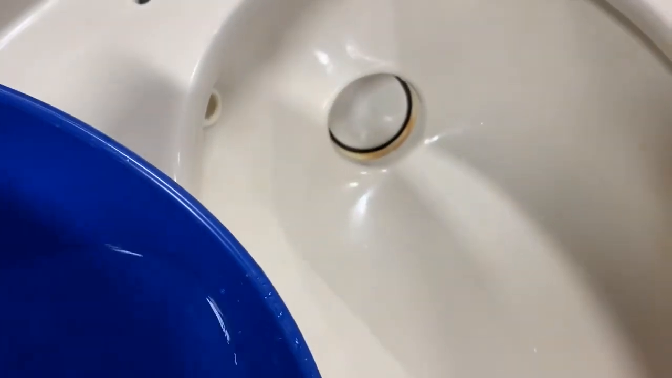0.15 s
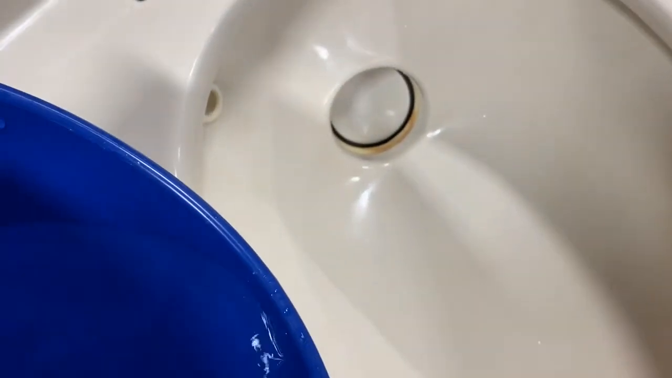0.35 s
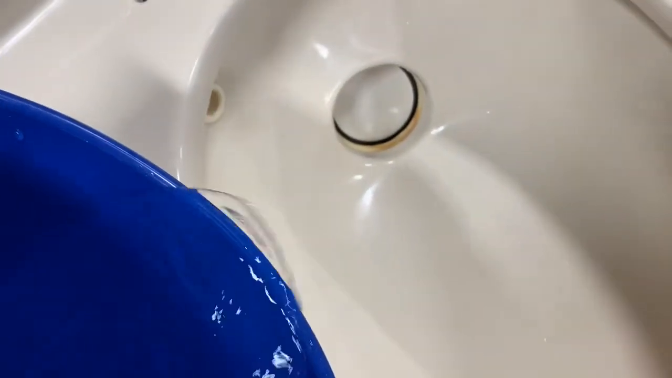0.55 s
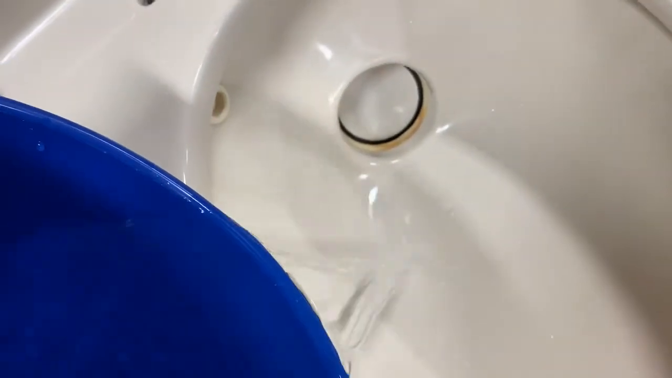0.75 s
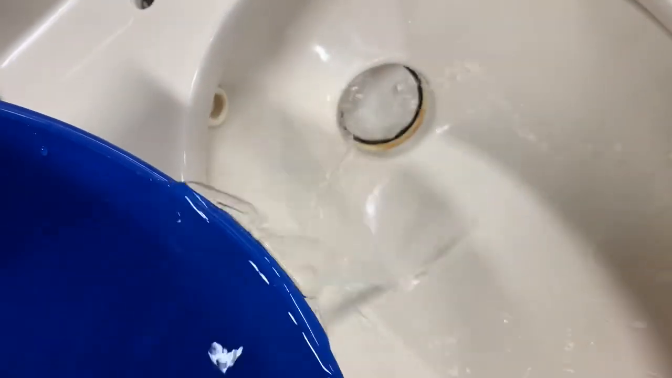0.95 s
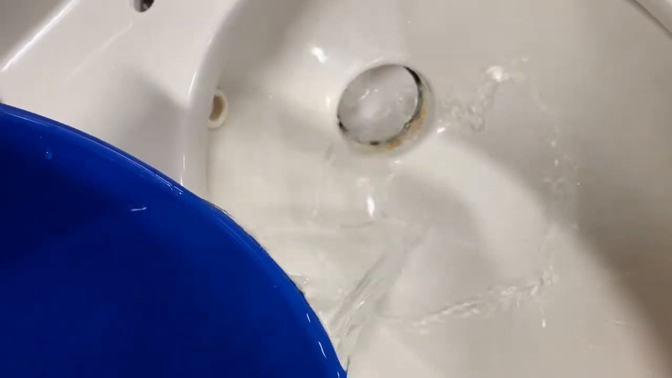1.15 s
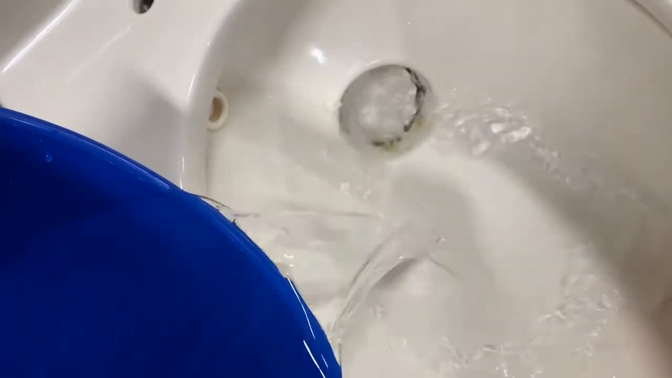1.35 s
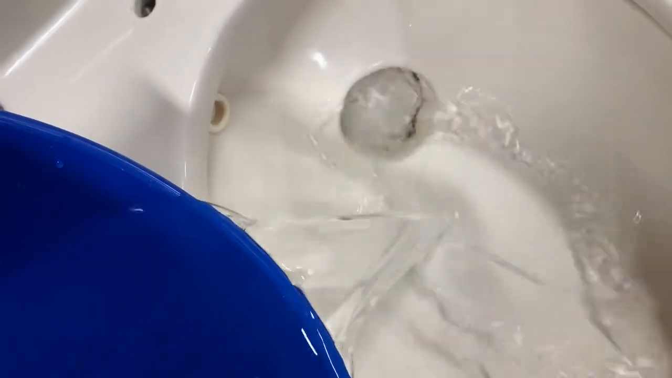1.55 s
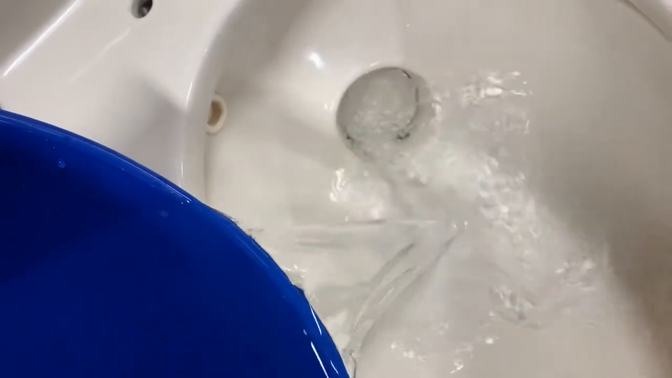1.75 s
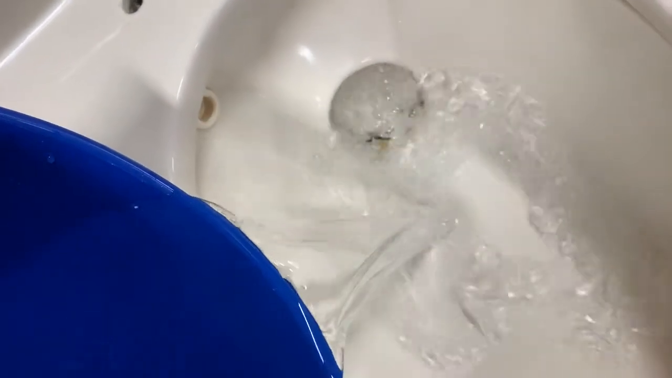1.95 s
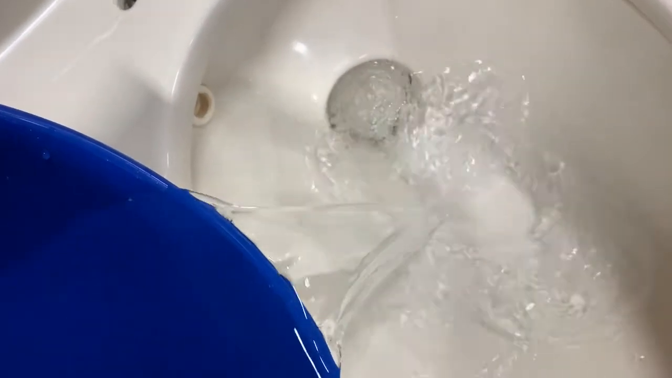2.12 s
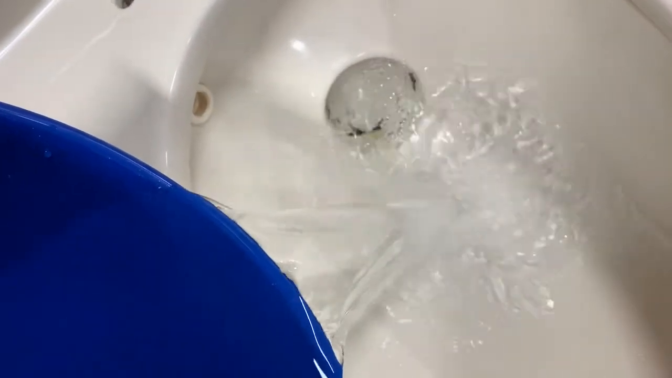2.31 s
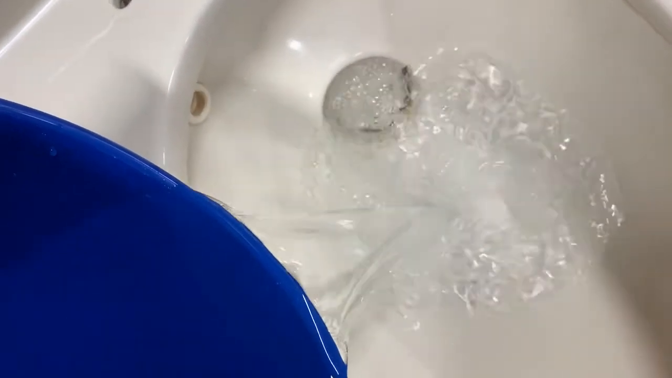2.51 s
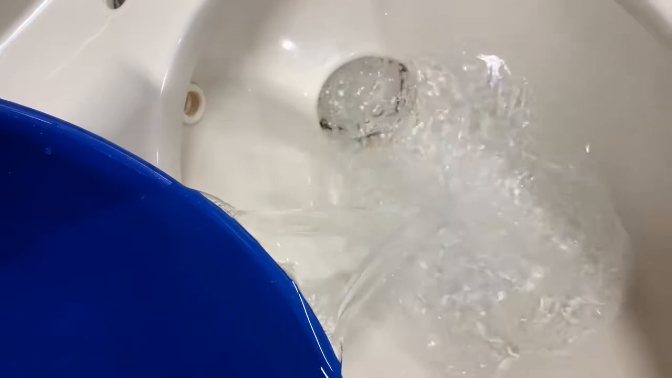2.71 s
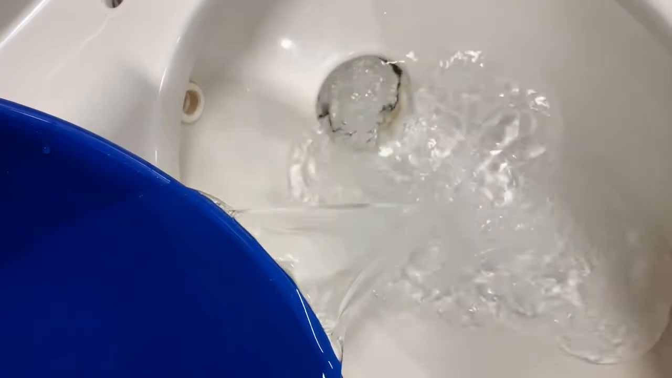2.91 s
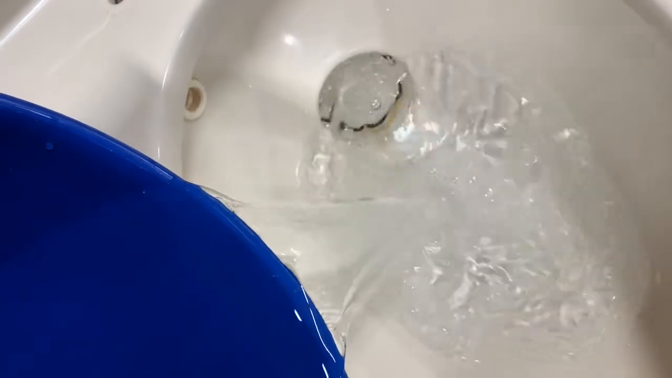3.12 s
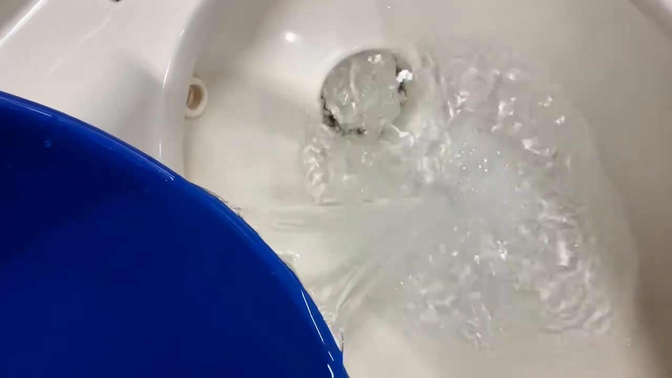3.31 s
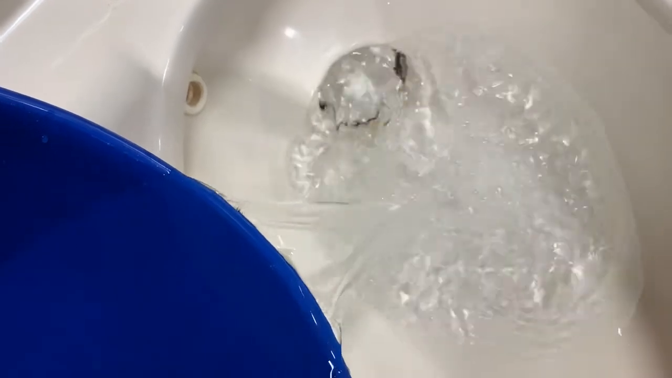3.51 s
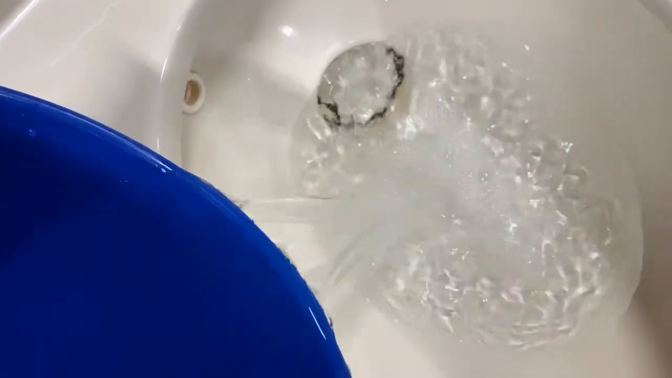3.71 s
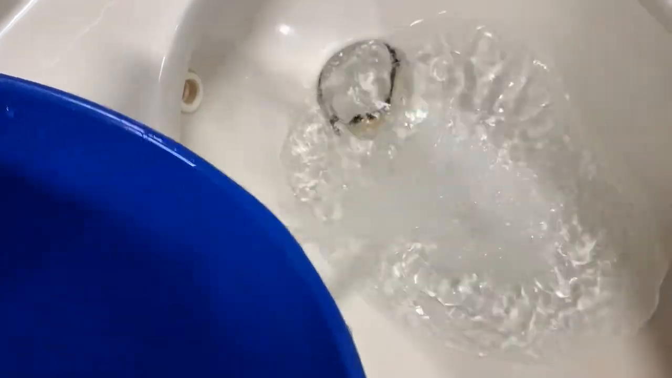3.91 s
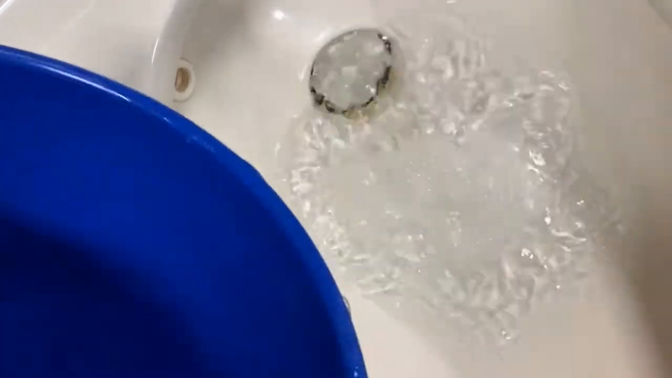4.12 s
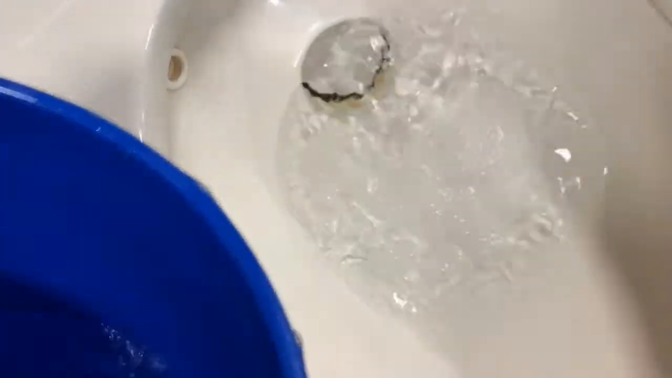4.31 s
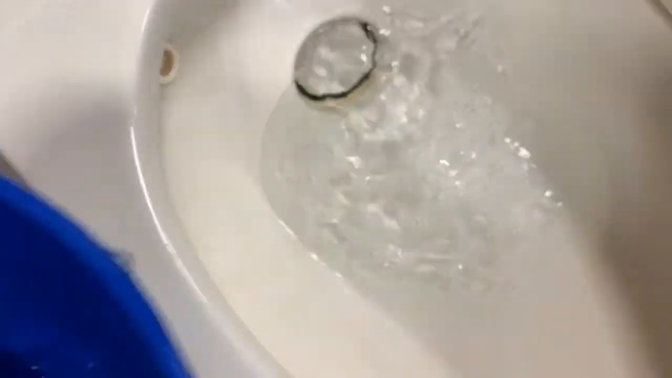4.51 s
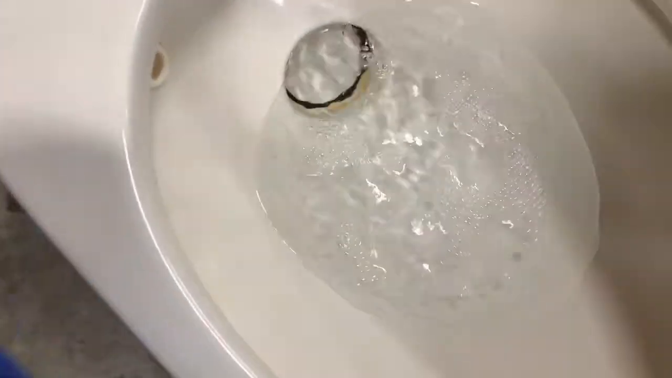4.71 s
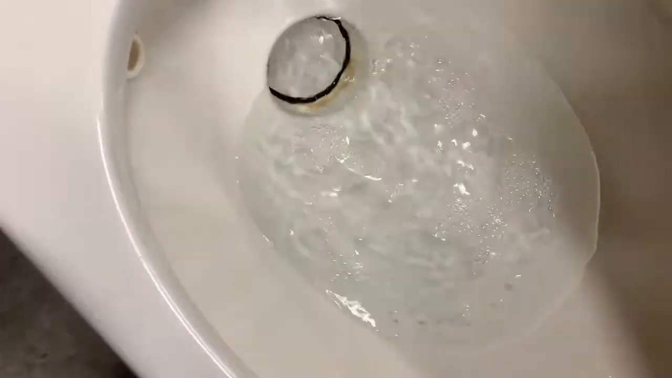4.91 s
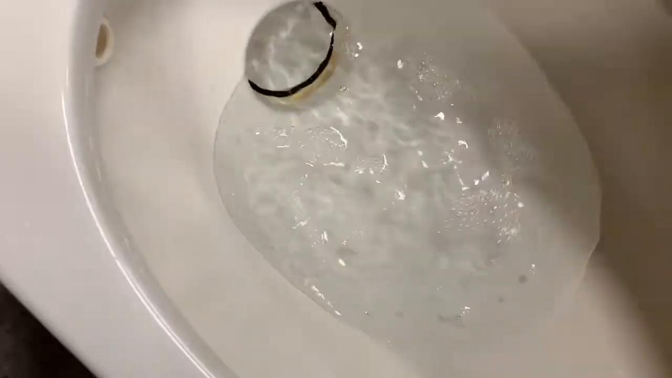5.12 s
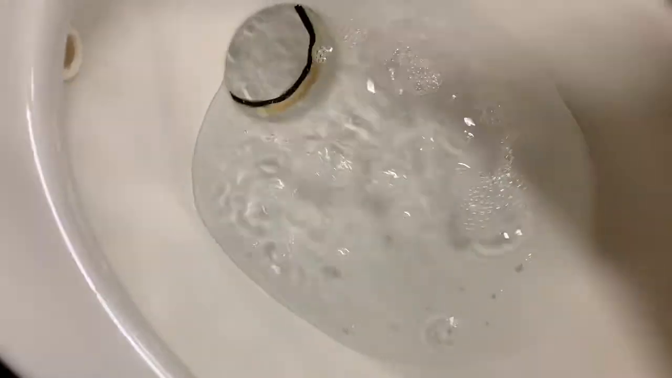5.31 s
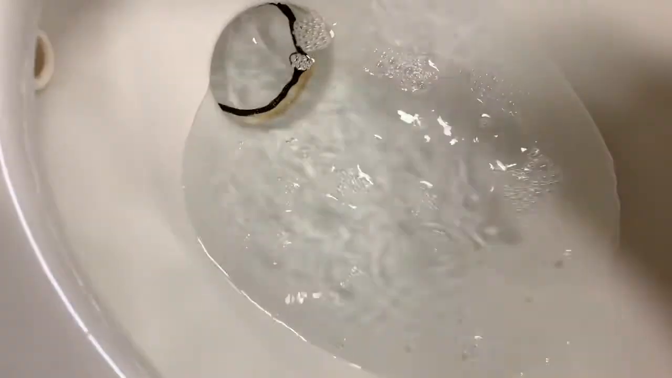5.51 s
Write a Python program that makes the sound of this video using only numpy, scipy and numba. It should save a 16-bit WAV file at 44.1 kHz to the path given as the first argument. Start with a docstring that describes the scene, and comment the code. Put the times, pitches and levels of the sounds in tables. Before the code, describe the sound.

A faint low room rumble and slight slopping come first. Then water tips from a plastic bucket into a porcelain bowl, slapping sharply on the glaze, with bubble plops and short drain glugs. It swells into a bright, churning rush with hollow ringing, steadies, breaks into last gulps and splashes, and leaves quiet fizzing foam. Close stereo pickup, short hard bowl echoes.

```python
"""Water poured into a bowl

Water is poured from a plastic bucket into a porcelain bowl in a workshop.
The stream slaps the glaze as decaying noise; trapped bubbles and gulps are damped sines of rising pitch.
Resonators ring the air of the bowl and of the drain, sparse taps echo, and foam leaves a fine fizz.
A low rumble of noise and a faint wavering hum fill the room; sides differ in arrival time and likeness."""
import sys
import numpy as np
from scipy import signal
from scipy.fft import rfft, irfft
from scipy.io import wavfile
from scipy.ndimage import uniform_filter1d
from numba import njit

SR = 44100
rng = np.random.default_rng(int(sys.argv[2]) if len(sys.argv) > 2 else 0)


def output_pcm(signal):
    """Save a mono or channel-first signal as 16-bit PCM at the path in sys.argv[1].

    Samples are clipped to [-1, 1] before scaling.
    """
    pcm = np.clip(np.atleast_2d(signal).T, -1, 1) * 32767
    wavfile.write(sys.argv[1], SR, np.round(pcm).astype(np.int16))


N = 249192

# Rumble of the room. Each row: time in seconds, level in dB.
RUMBLE_LEVEL = [(0.0, -59), (0.42, -63), (1.5, -66.5), (4.3, -65.5), (4.83, -58.5), (5.66, -62.5)]
# Its spectrum. Each row: frequency in Hz, density in dB per Hz.
ROOM_SPECTRUM = [(25, -35), (53, -2), (71, -2.5), (93, -3), (142, -6.5), (199, -8.5), (279, -29),
                 (3020, -44.5), (13300, -47), (16200, -67)]
# The hum. Each row: time in seconds, level of the sine in dB.
HUM_LEVEL = [(0.0, -61.5), (0.42, -75), (1.04, -55.5), (1.4, -63), (3.0, -70.5), (4.4, -72), (4.83, -58),
             (5.66, -71.5)]
# Low slops of water in bucket and bowl. Each row: time in seconds, level before filtering in dB.
LAPPING_LEVEL = [(0.0, -63), (0.17, -67), (0.3, -90), (0.75, -84), (1.0, -65), (3.05, -64.5), (4.1, -66.5),
                 (4.45, -65), (4.6, -71.5), (4.72, -61.5), (4.9, -63.5), (5.3, -65.5), (5.66, -84)]
# Their spectrum before filtering. Each row: frequency in Hz, density in dB per Hz.
SLOSH_SPECTRUM = [(200, -51), (270, -10), (400, 3.5), (550, -0.5), (800, -11.5), (1200, -20), (2200, -23.5),
                  (3000, -58.5)]
# Foam bursting on the pool. Each row: time in seconds, level in dB.
FIZZ_LEVEL = [(4.1, -57), (4.3, -79), (4.5, -54), (5.0, -55), (5.3, -54), (5.66, -56)]
# Its spectrum. Each row: frequency in Hz, density in dB per Hz.
FOAM_SPECTRUM = [(1300, -30), (1800, -20), (3000, -18), (4500, -10), (7000, -6.5), (8500, -0.5),
                 (10300, -1.5), (13000, -0.5), (14500, -8.5), (16200, -22)]
# Air in the drain mouth. Each row: peak time in seconds, peak level in dB.
DRAIN_GLUGS = [(1.15, -58.5), (1.31, -55), (1.46, -47.5), (1.55, -52), (1.77, -51)]
# Low notes of the bowl's air, rung by knocks.
# Each row: undisturbed pitch in Hz, width of the narrower resonance in Hz, relative level in dB.
BOWL_NOTES = [(777, 62, -5.5), (1245, 38, 5.5), (1622, 120, -9.5), (2232, 70, -7)]
# Resonances of the bowl's air. Each row: mean pitch in Hz, width in Hz, gain in dB.
BOWL_RESONANCES = [(1567, 32, -1.5), (2745, 100, 1)]
# Large air pockets gulping in the pool.
# Each row: start in seconds, strength in dB, starting pitch in Hz, t60 in seconds, share of pitch gained per t60.
GULP_EVENTS = [(0.794, -39.5, 506, 0.036, 0.58), (1.573, -37.5, 744, 0.11, 0.21),
               (1.749, -33.5, 593, 0.058, 0.16), (1.85, -30, 540, 0.14, 0.4),
               (1.933, -23.5, 765, 0.07, 0.8), (1.994, -29.5, 470, 0.09, 0.375),
               (2.076, -28.5, 558, 0.03, 0.22), (2.455, -41, 763, 0.05, .05),
               (2.528, -26, 650, 0.041, 0.25), (2.78, -44, 201, 0.092, 0.19),
               (3.012, -33.5, 200.4, 0.098, 0.34), (3.639, -45.5, 192, 0.09, 0.29),
               (3.719, -44, 207, 0.11, 0.15), (3.828, -33, 800, 0.077, 0.5), (3.86, -28, 733, 0.033, 0.32),
               (3.947, -22.5, 476.6, 0.067, 0.54), (3.99, -35, 491, 0.097, 0.32),
               (4.05, -30, 492, 0.043, 0.32), (4.088, -24.5, 495, 0.052, 0.22),
               (4.141, -21.5, 592, 0.02, 0.42), (4.245, -28.5, 613, 0.059, 0.074),
               (4.247, -32, 241, 0.14, 0.14), (4.298, -39, 644, 0.086, 0.046), (4.425, -54, 526, 0.033, .1),
               (4.738, -47.5, 630, 0.038, 0.22), (4.865, -53, 792, 0.13, 0.024),
               (4.908, -46.5, 970, 0.034, 0.046), (4.907, -49.5, 228, 0.14, 0.38),
               (5.005, -57, 650, 0.032, 0.11), (5.078, -58, 757, 0.034, .1)]
# Single bubbles that stand out. Each row: start in seconds, strength in dB, starting pitch in Hz, t60 in seconds.
BUBBLE_EVENTS = [(0.8118, -20.5, 1230, 0.013), (0.86, -26.5, 2440, 0.039), (1.039, -32.5, 1900, 0.027),
                 (1.149, -23.5, 4070, 0.038), (1.172, -26, 1167, 0.024), (1.2397, -24.5, 1143, 0.033),
                 (1.309, -19.5, 1445, 0.014), (1.402, -14.5, 1400, 0.015), (1.4432, -20, 1140, 0.034),
                 (1.446, -16, 3780, 0.022), (1.482, -24, 1224, 0.03), (1.5738, -23.5, 1350, 0.061),
                 (1.6824, -32, 1108, 0.089), (1.7742, -4, 1540, 0.0089), (1.809, -12, 1450, 0.0087),
                 (1.833, -16.5, 1460, 0.017), (1.87, -19.5, 1153, 0.04), (1.936, -20.5, 1390, .03),
                 (1.9656, -10.5, 2636, 0.028), (1.998, -26, 1396, 0.061), (2.1149, -16.5, 1170, 0.015),
                 (2.195, -27, 1300, 0.059), (2.224, -17.5, 1236, 0.02), (2.19, -27, 2160, 0.03),
                 (2.246, -21, 2180, 0.016), (2.284, -19, 1340, .02), (2.316, -19.5, 1240, 0.018),
                 (2.343, -16, 1490, 0.014), (2.4921, -21, 1250, 0.023), (2.633, -25.5, 1244, 0.035),
                 (2.7468, -10.5, 2040, 0.011), (3.838, -34, 1567, 0.038), (3.842, -40, 2200, .05),
                 (3.904, -26, 1278, 0.037), (3.931, -29.5, 1284, 0.044), (3.974, -28.5, 2870, 0.026),
                 (4.087, -20.5, 1190, 0.015), (4.103, -23, 2060, 0.014), (4.14, -34, 1307, 0.044),
                 (3.9926, -20.5, 2160, 0.033), (4.247, -27.5, 1270, 0.044), (4.2957, -22, 975, 0.016),
                 (5.317, -46.5, 2165, 0.071)]
# Slugs of water slapping down.
# Each row: start in seconds, nominal peak in dB, churn relative to that peak in dB, t60 in seconds.
SLAPS = [(0.788, -29, -27, 0.048), (0.847, -24.5, -5, 0.076), (0.881, -19, -3.5, 0.048),
         (0.963, -25, -20, 0.042), (1.042, -34, 7.5, 0.045), (1.1, -17, -33, 0.03),
         (1.133, -23.5, -8, 0.13), (1.208, -15.5, -33, 0.027), (1.24, -22.5, 1.5, 0.05),
         (1.401, -23.5, -8, 0.019), (1.447, -19, 5, 0.032), (1.562, -22, -29, 0.12),
         (1.6478, -14, -26, 0.02), (1.683, -23, 6.5, 0.048), (1.912, -24, -3, 0.12),
         (1.995, -21, -16, 0.026), (2.807, -26, 8, 0.062), (2.996, -23, 1, 0.03),
         (3.036, -26.5, -10, 0.025), (3.196, -29.5, -12, 0.16), (3.303, -29, 13, 0.052),
         (3.822, -24, -3, 0.045), (3.881, -29.5, -4, 0.088), (3.943, -24, 11, 0.028),
         (3.984, -26, 4.5, 0.061), (4.0874, -16, -21, 0.017), (4.237, -26.5, 5, 0.042),
         (4.246, -18, 6, 0.029), (4.2932, -29, 2, 0.044), (4.328, -46, 11, 0.044)]
# Bright opening of a slap. Each row: frequency in Hz, density in dB per Hz.
CRACK_SPECTRUM = [(4000, -22.5), (7200, -8), (8000, 0), (14000, -6), (16200, -18.5)]
# The steady stream before the final mix.
# Each row: time in seconds, churn of the pool in dB, spray on the glaze in dB, ringing of the bowl in dB.
POUR_LEVELS = [(0.738, -92, -63, -99), (0.8, -86, -72, -91), (1.0, -56.5, -72, -92),
               (1.11, -50.5, -50.5, -87), (1.22, -41, -43, -64), (1.42, -50, -35, -44),
               (1.7, -48.5, -42.5, -62), (2.02, -36.5, -41.5, -55.5), (2.32, -32, -38, -38),
               (2.55, -38, -41, -44), (3.1, -43.5, -47.5, -52), (3.78, -47, -50.5, -56.5),
               (4.12, -60, -48, -47.5), (4.22, -75, -63, -100), (4.38, -62, -57, -65),
               (4.5, -91, -64, -103)]
# Gushes over the rim of the bucket, before the final mix.
# Each row: peak time in seconds, length in seconds, then churn, spray, bowl and slop levels, all in dB.
GUSH_EVENTS = [(0.82, 0.044, -41, -44, -78, -56), (0.88, 0.1, -47, -35, -85, -78),
               (1.17, 0.024, -27.5, -26.5, -71, -60), (1.3, 0.11, -34.5, -34.5, -55, -53),
               (1.54, 0.3, -32, -36, -63, -69), (1.78, 0.56, -30, -34, -41, -75),
               (2.14, 0.28, -50, -35, -65, -78), (3.22, 0.42, -37.5, -44, -46.5, -61),
               (3.46, 0.36, -42.5, -44, -67, -85), (3.7, 0.2, -41.5, -41.5, -52.5, -72),
               (3.85, 0.089, -64, -64, -40, -60), (3.98, 0.23, -46, -66, -46, -50.5),
               (4.09, 0.055, -48, -59, -57, -46.5), (4.27, 0.081, -47, -61, -68, -53)]
# Bubbling of the pool. Each row: frequency in Hz, density in dB per Hz.
CHURN_SPECTRUM = [(600, -43), (800, -10.5), (1100, -3.5), (1500, -9), (1800, -2), (2600, -1), (3500, 2),
                  (5000, -7), (6000, -33.5)]
# Short plops in the froth. Each row: frequency in Hz, density in dB per Hz.
FROTH_SPECTRUM = [(750, -23), (1150, -1), (1600, -2), (2400, -5.5), (3300, -25)]
# Spray on the glaze. Each row: frequency in Hz, density in dB per Hz.
SPRAY_SPECTRUM = [(3500, -18.5), (4300, -7.5), (5500, -7), (7200, -9.5), (8000, -6.5), (10300, -7.5),
                  (13000, -7.5), (14500, -14), (16200, -45)]
# Likeness of water at the two microphones. Each row: frequency in Hz, likeness from 0 to 1.
WATER_LIKENESS = [(300, .88), (1400, .85), (3000, .55), (6000, .45), (7600, .3), (8600, .8), (13000, .88)]
# Delay of the right microphone. Each row: frequency in Hz, lag in samples.
WATER_LAG = [(300, 2), (600, -5), (1200, -.5), (3000, 2), (4400, 2), (4800, 21.5), (7400, 21.5),
             (7700, -13.3)]

HUM_HZ, HUM_CLIMB_HZ_PER_S = 189, 10
HUM_WIDTH_HZ = 18.7  # twice the rms wander of pitch
GLUG_S, OPEN_HZ, FLOODED_HZ = 0.091, 489, 292  # fading length; drain pitch when open and when flooded
FLOOD_S, SINK_S = 1.1, 0.23  # the moment the pitch starts to sink, and its time constant
CALM_FROM_S, CALM_BY_S = 2.11, 2.56  # the pool grows deep and steady
STIRRED, CALM = 0.085, 0.0096  # rms waver of the bowl's notes before and after, as a share of pitch
DRAINING_FROM_S, DRAINING_BY_S = 3.79, 4.01  # the stream breaks up
DRAINING_CLIMB = 0.036  # climb of the notes over that time, as a share of pitch
POOL_PAN_DB, DREGS_PAN_DB = -6, 4  # left over right: early gulps lie right, the dregs lie left
DREGS_S, DEEP_HZ = 4.2, 300  # start of the dregs; main gulps up to this pitch stay central
SLAP_CREST_DB = 2  # lowers each slap below its nominal peak
CRACK_DB, CRACK_S = -9, 0.002  # level against the nominal peak; delay and half width of the burst
SPITS_PER_S, SPIT_SPREAD_DB = 75, 3.5
GUSH_RISE, GUSH_FADE_DB = 0.84, 25.5  # rise time as a share of the length; fall over one length
EDGE_HZ = 16100


def amp(db):
    """Logarithmic law of level: decibels become an amplitude ratio."""
    return 10 ** (np.asarray(db) / 20)


def evened(x):
    """Normalisation of power: scales to rms 1."""
    return x / np.sqrt(np.mean(x ** 2) + 1e-20)


def read(points, hz):
    """Interpolation of a curve on a logarithmic frequency axis."""
    f, value = np.transpose(points)
    return np.interp(np.log(hz + 1), np.log(f + 1), value)


def level(rows, axis=1):
    """Amplitude envelope: dB joined by straight lines, -120 dB outside the rows."""
    rows = np.asarray(rows)
    return amp(np.interp(np.arange(N) / SR, rows[:, 0], rows[:, axis], -120, -120))


def drift(width_s):
    """Slow random wander of a parameter: twice-smoothed noise of rms 1."""
    size = int(width_s * SR)
    smooth = uniform_filter1d(rng.standard_normal(N), size)
    return evened(uniform_filter1d(smooth, size))


def clumps(width_s, depth_db):
    """Random amplitude modulation: surges as a gain of rms 1."""
    return evened(amp(depth_db * drift(width_s)))


def swells(rows, axis, rise=1., fade_db=14.):
    """Exponential growth and decay: summed power of rows of peak s, length s, dB.."""
    t, power = np.arange(N) / SR, np.zeros(N)
    for row in rows:
        u = (t - row[0]) / row[1]
        power += amp(row[axis] - fade_db * np.maximum(u, -u / rise)) ** 2
    return power


def gushes(axis):
    """Addition of powers: what the gushes add to one layer."""
    return swells(GUSH_EVENTS, axis, GUSH_RISE, GUSH_FADE_DB)


def hiss(spectrum, like=WATER_LIKENESS, lag=WATER_LAG):
    """Spatial coherence: steady coloured noise, partly alike at the two microphones."""
    hz = np.fft.rfftfreq(N, 1 / SR)
    left, other = rfft(rng.standard_normal((2, N)))
    same = np.clip(read(like, hz), 0, 1)
    delayed = left * np.exp(-2j * np.pi * hz * read(lag, hz) / SR)
    right = same * delayed + np.sqrt(1 - same ** 2) * other
    return evened(irfft(np.array([left, right]) * amp(read(spectrum, hz)), N))


def resonate(x, hz, width):
    """Resonance by heterodyning: shifts the curve hz to zero, smooths, and shifts back at gain 1."""
    turn = np.exp(2j * np.pi * np.cumsum(hz * np.ones(N)) / SR)
    r = np.exp(-np.pi * width / SR)
    return 2 * (turn * signal.lfilter([1 - r], [1, -r], x / turn)).real


@njit
def ring(rows, n, sr):
    """Damped oscillation of rising pitch; rows: s, gain, Hz, t60, rise, left-right gain, lag samples, attack s."""
    out = np.zeros((2, n))
    for s, gain, hz, t60, rise, side, lag, attack in rows:
        for c in range(2):
            start = s * sr + c * lag
            for i in range(max(int(start) + 1, 0), min(int(start + t60 * sr), n)):
                t = (i - start) / sr
                shape = (1 - np.exp(-t / attack)) * 10 ** (-3 * t / t60)
                phase = 2 * np.pi * hz * t * (1 + rise * t / t60 / 2)
                out[c, i] += gain * side ** (.5 - c) * shape * np.sin(phase)
    return out


def swarm(spectrum, per_s, cycles, spread_db, rise, pan_db):
    """Superposition of many bubbles at random moments, pitches and places; a few are loud."""
    count = int(per_s * N / SR)
    u, g = rng.random((count, 3)), rng.standard_normal((count, 3))
    lo, hi = spectrum[0][0], spectrum[-1][0]
    hz = lo * (hi / lo) ** u[:, 1]
    size_db = -spread_db * np.log(np.maximum(u[:, 2], .004))
    t60 = cycles / hz * np.exp(0.62 * g[:, 2])
    gain = amp(read(spectrum, hz) + size_db) * hz  # high bubbles are short and thinly spread
    # scattered places spread the arrival times, which blurs the likeness
    likeness = np.clip(read(WATER_LIKENESS, hz), .05, .99)
    scatter = np.sqrt(-2 * np.log(likeness)) * SR / (2 * np.pi * hz)
    lag = read(WATER_LAG, hz) + scatter * g[:, 1]
    rows = [u[:, 0] * N / SR, gain, hz, t60, rise + 0 * hz, amp(pan_db * g[:, 0]), lag, t60 / 8]
    return evened(ring(np.transpose(rows), N, SR))


def room():
    """Broadband rumble, nearly coherent in the bass, and a frequency-modulated hum that creeps upward."""
    rumble = hiss(ROOM_SPECTRUM, [(100, 0.91), (1000, 0.14)], [(0, 0), (1, 0.025)]) * clumps(0.044, 0.61)
    wander = evened(signal.lfilter([1], [1, -np.exp(-80 / SR)], rng.standard_normal(N)))
    hz = HUM_HZ + HUM_CLIMB_HZ_PER_S * np.arange(N) / SR + HUM_WIDTH_HZ * wander / 2
    hum = level(HUM_LEVEL) * np.sin(2 * np.pi * np.cumsum(hz) / SR) * clumps(0.01, 3.1)
    return level(RUMBLE_LEVEL) * rumble + np.array([hum, np.roll(hum, 6)])  # right is 6 samples late


def lapping():
    """Level-dependent spectrum: low slops of moving water; the livelier, the brighter."""
    slops = swarm(SLOSH_SPECTRUM, 1100, 14, 1.8, rise=.2, pan_db=3)
    slops = evened(slops + 0.59 * hiss(SLOSH_SPECTRUM)) * clumps(0.022, 3.2)
    dull = signal.sosfilt(signal.butter(4, 430, fs=SR, output="sos"), slops)
    gain = np.sqrt(level(LAPPING_LEVEL) ** 2 + gushes(axis=5))
    lively = (gain / amp(-56)) ** .45
    return gain * (dull + lively * (slops - dull))


def fizz():
    """Dense random superposition: tiny foam bubbles burst all over the pool."""
    pops = swarm(FOAM_SPECTRUM, 6500, 30, 3.0, rise=.05, pan_db=3)
    foam = evened(pops + 0.66 * hiss(FOAM_SPECTRUM))
    return level(FIZZ_LEVEL) * foam * clumps(0.0055, 1.3) * clumps(0.045, 1.3)


def drain():
    """Resonance driven by turbulence: the drain mouth rings, and its pitch sinks as it floods."""
    flooding = np.maximum(np.arange(N) / SR - FLOOD_S, 0)
    pitch = FLOODED_HZ + (OPEN_HZ - FLOODED_HZ) * np.exp(-flooding / SINK_S)
    turbulence = rng.standard_normal(N)
    tone = evened(resonate(resonate(turbulence, pitch, 45), pitch, 70))
    glugs = [(s, GLUG_S, db) for s, db in DRAIN_GLUGS]
    gain = np.sqrt(swells(glugs, axis=2, rise=0.85, fade_db=17.5))
    return gain * tone * clumps(0.023, 1.8)


def bowl_notes():
    """Impulsive excitation of resonances: irregular knocks of falling water ring the air in the bowl."""
    t = np.arange(N) / SR
    knocks = (rng.random(N) < 600 / SR) * rng.standard_normal(N) * clumps(0.01, 3)
    push = knocks + 0.4 * np.roll(knocks, 300) * [[1], [-1]]  # a later copy, opposed at the two sides
    push = push + 0.035 * rng.standard_normal((2, N))
    bend = 1 + np.interp(t, (CALM_FROM_S, CALM_BY_S), (STIRRED, CALM)) * drift(.03)
    bend += np.interp(t, (DRAINING_FROM_S, DRAINING_BY_S), (0, DRAINING_CLIMB))
    notes = 0
    for hz, width, db in BOWL_NOTES:
        narrow = resonate(push, hz * bend, width)
        notes = notes + amp(db) * resonate(narrow, hz * bend, 2.8 * width)
    return np.sqrt(level(POUR_LEVELS, axis=3) ** 2 + gushes(axis=4)) * evened(notes)


def with_company(rows, count, spread_hz, late_s, under_db):
    """Fragmentation: each pocket breaks off smaller neighbours of nearby pitch, a moment later."""
    rows = np.array(rows)
    chance = rng.random((len(rows), count, 4))
    extra = np.repeat(rows[:, None], count, axis=1)
    extra[..., 0] += late_s * chance[..., 0]
    extra[..., 1] *= amp(-under_db * (1.0 + chance[..., 1]))
    reach_hz = spread_hz * np.clip(extra[..., 2] / 500, 0, 1) ** 3  # the deepest stay near their pitch
    extra[..., 2] += np.maximum(reach_hz * (chance[..., 2] - .38), -extra[..., 2] / 5)
    extra[..., 3] *= 0.4 + 0.6 * chance[..., 3]
    return np.vstack([rows, extra.reshape(-1, rows.shape[1])])


def voices_of_air():
    """Pulsation of trapped air: single bubbles and gulps ring in small clusters."""
    small = [(s, amp(db), hz, t60, .04, 1, read(WATER_LAG, hz), .003) for s, db, hz, t60 in BUBBLE_EVENTS]
    large = []
    for s, db, hz, t60, rise in GULP_EVENTS:
        pan_db = POOL_PAN_DB if s < DREGS_S else DREGS_PAN_DB
        side = amp((hz > DEEP_HZ) * pan_db)
        large.append((s, amp(db), hz, t60, rise, side, read(WATER_LAG, hz), .005))
    small = with_company(small, count=7, spread_hz=800, late_s=.011, under_db=10)
    large = with_company(large, count=10, spread_hz=1100, late_s=.035, under_db=8)
    return ring(np.vstack([small, large]), N, SR)


def cracks():
    """Broadband transient: each slap opens with a brief bright spit."""
    t = np.arange(N) / SR
    gain = sum(amp(db + CRACK_DB) * np.exp(-((t - s) / CRACK_S - 1) ** 2) for s, db, _, _ in SLAPS)
    return gain * hiss(CRACK_SPECTRUM)


def spits():
    """Random impulses spread by a window: brief bright puffs of hiss within the spray."""
    size_db = SPIT_SPREAD_DB * np.minimum(rng.exponential(1, N), 3)
    size = (rng.random(N) < SPITS_PER_S / SR) * amp(size_db)
    puffs = signal.oaconvolve(size, np.hanning(round(2 * CRACK_S * SR)), "same")
    return evened(puffs * hiss(CRACK_SPECTRUM))


def slap_powers():
    """Exponential decay: each slap swells within milliseconds and dies fast; powers for churn and spray."""
    out, t = np.zeros((2, N)), np.arange(6000) / SR
    for s, db, mid_db, t60 in SLAPS:
        shape = (1 - np.exp(-t / 0.0042)) ** 2 * amp(db - SLAP_CREST_DB - 60 * t / t60)
        part = out[:, round(s * SR):round(s * SR) + len(t)]
        part += np.array([amp(mid_db) * shape, shape]) ** 2
    return out


def bowl(x):
    """Cavity resonance: the bowl's air reinforces pitches that shift with the heaving surface."""
    out = x
    for hz, width, db in BOWL_RESONANCES:
        out = out + amp(db) * resonate(x, hz * (1 + 0.029 * drift(0.06)), width)
    return out


def churn(surge, slaps):
    """Bubble noise of an entraining jet: bubbles and froth over a wash of turbulence."""
    x = swarm(CHURN_SPECTRUM, 5500, 42, 2.4, rise=.03, pan_db=3) + .3 * hiss(CHURN_SPECTRUM)
    x += .6 * swarm(FROTH_SPECTRUM, 260, 20, 2.5, rise=.14, pan_db=3)
    stream_power = level(POUR_LEVELS) ** 2 + gushes(axis=2)
    return evened(x) * np.sqrt(stream_power * surge ** 2 + slaps)


def spray(surge, slaps):
    """Impact noise on the glaze: bright small bubbles, hiss and brief puffs."""
    x = swarm(SPRAY_SPECTRUM, 3000, 95, 1.6, rise=0.118, pan_db=5) + 0.41 * hiss(SPRAY_SPECTRUM)
    x += .6 * spits()
    stream_power = level(POUR_LEVELS, axis=2) ** 2 + gushes(axis=3)
    return evened(x) * np.sqrt(stream_power * surge ** 2 + slaps) * clumps(0.0099, 1.07)


def pour():
    """Common modulation: churn and spray surge together, and slaps add to their power."""
    surge = clumps(0.017, 1.65)
    mid_slaps, high_slaps = slap_powers()
    left_right = amp([[-1.6], [-.4]])
    return amp(-6.5) * bowl(churn(surge, mid_slaps)) + spray(surge, high_slaps) * left_right


def walls(x):
    """Reverberation in the bowl: sparse decaying taps of random sign, mostly shared by both sides."""
    decay = amp(-60 * np.arange(4000) / SR / 0.16)
    taps = rng.choice([-1., 1.], (3, 4000)) * (rng.random((3, 4000)) < .05) * decay
    taps = taps[0] + .5 * taps[1:]
    return signal.oaconvolve(x, taps / np.linalg.norm(taps[0]), axes=1)[:, :N]


def scene():
    """Linear superposition of the room, the water and its echoes in the bowl."""
    background = room() + lapping() + fizz() + drain()
    air, stream = voices_of_air(), pour()
    echoes = walls(amp(-9.0) * air + amp(-7.0) * stream)
    return background + bowl_notes() + air + cracks() + stream + echoes


def record(dry):
    """Band limitation: a linear-phase low-pass filter."""
    return signal.oaconvolve(dry, signal.firwin(511, EDGE_HZ, window=("kaiser", 9), fs=SR)[None], "same")


dry = scene()
out = record(dry)
output_pcm(out)
```